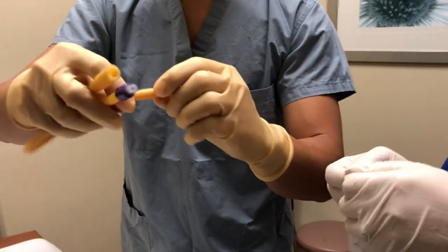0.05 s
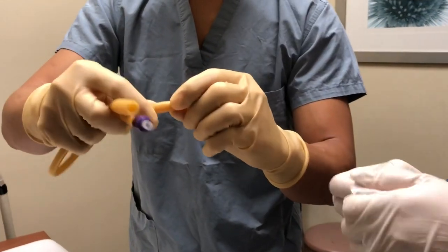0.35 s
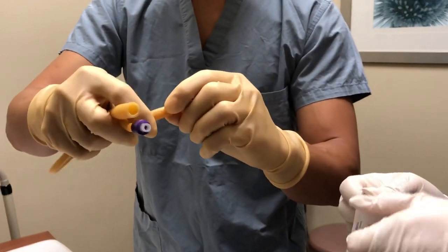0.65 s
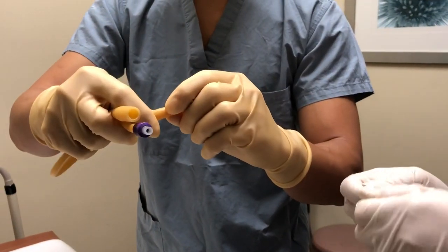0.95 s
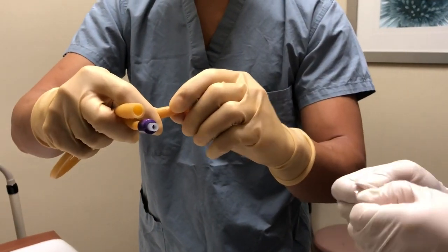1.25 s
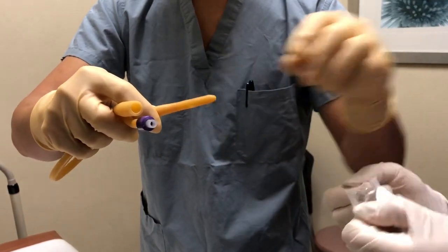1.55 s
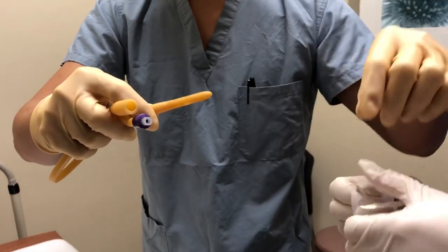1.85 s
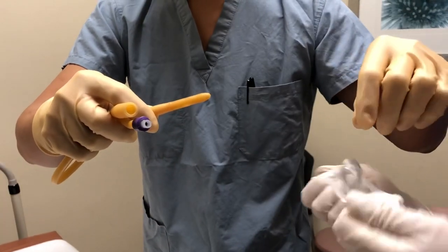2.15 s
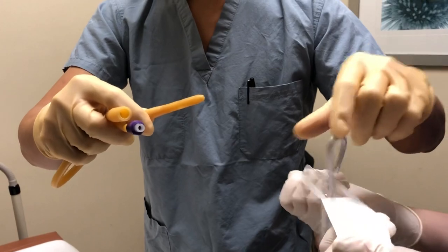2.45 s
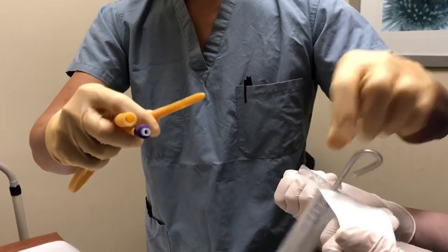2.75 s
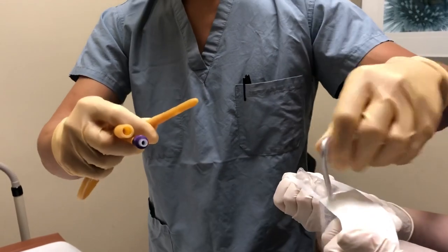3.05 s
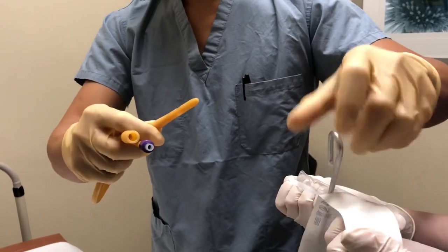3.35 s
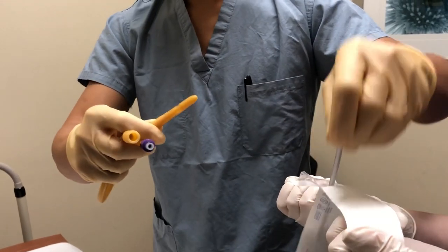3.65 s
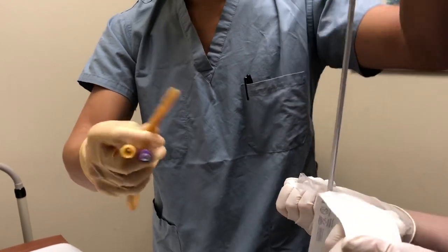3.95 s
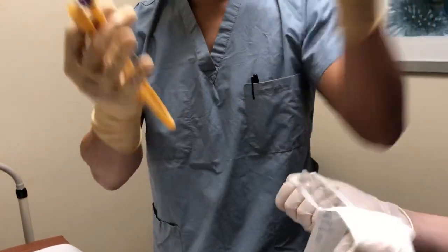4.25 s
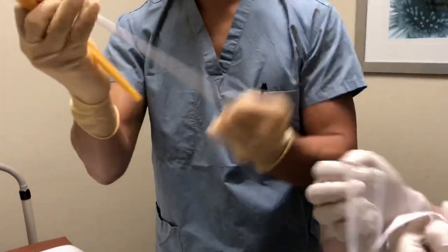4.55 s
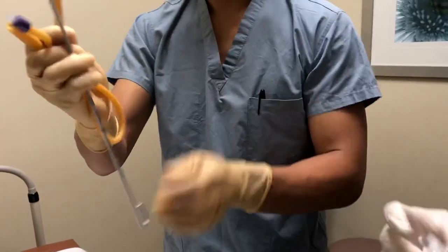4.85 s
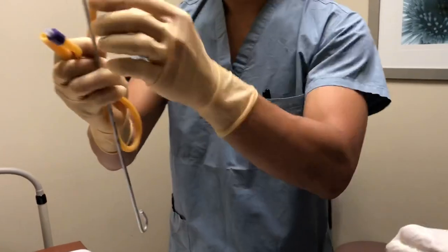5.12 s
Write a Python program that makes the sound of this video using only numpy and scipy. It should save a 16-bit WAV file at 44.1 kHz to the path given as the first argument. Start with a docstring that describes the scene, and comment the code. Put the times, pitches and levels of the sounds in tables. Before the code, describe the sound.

In a small, quiet room with a low fan hum, a sterile paper and plastic sleeve crinkles close by. The crisp snaps come sparsely at first, then grow loud and crowded as it is opened. They thin out, a long rod rubs briefly along the paper and comes free with a soft knock, and a last, lighter run of crackling follows.

```python
"""In a small clinic room with humming ventilation, gloved hands start on a paper and plastic wrapper.
Its creases buckle in sharp snaps over a soft rustle, loudest at 1.5 s and busiest from 2 to 2.6 s.
Near 3.7 s a long rod rubs its way out of this sterile sleeve and knocks as it comes free.
From 4.4 s the wrapper crackles again. The room rings briefly after each sound."""
import sys
import numpy as np
from scipy import signal
from scipy.fft import rfft, irfft, next_fast_len
from scipy.io import wavfile
from scipy.ndimage import uniform_filter1d

SR = 44100
rng = np.random.default_rng(int(sys.argv[2]) if len(sys.argv) > 2 else 0)


def int16_out(signal):
    """Quantize to a 16-bit WAV file."""
    q = np.round(np.clip(np.atleast_2d(signal).T, -1, 1) * 32767)
    wavfile.write(sys.argv[1], SR, q.astype(np.int16))


N = 228521
TIME = np.arange(N) / SR

# the loudest sharp snaps, mostly creases of the wrapper, the one at 3.97 s the rod knocking free: t/s,
# level/dB, centre f/Hz, width/centre, crack level/dB against the body
SHARP_SNAPS = [(0.173, -24.5, 1600, 3.6, -21), (0.195, -23, 2020, 1.2, 2.5),
               (0.2248, -23.5, 3940, 2.5, -12), (0.2798, -22, 3130, 1.8, -17),
               (0.4628, -30.5, 2550, 0.3, 4), (0.5046, -21, 1520, 1.7, -13), (0.5434, -29, 4900, 1.1, -16),
               (0.6561, -28, 5250, 2.5, -30), (0.7088, -12.5, 2770, 2, -32), (0.721, -16, 3500, 1.4, -24),
               (0.759, -17, 3050, 0.42, -27), (0.8039, -19.5, 4000, 3.6, -6), (1.048, -26, 3950, 2.2, -22),
               (1.0832, -24.5, 4180, 1.34, -23), (1.154, -33.5, 1330, 0.45, -12),
               (1.3986, -14.5, 3800, 0.7, -41), (1.424, -18.5, 4280, 1.6, -17), (1.503, 2, 5300, 2.6, -26),
               (1.5087, -8, 6450, 1.2, -26), (1.5385, -16.5, 1820, 2.5, -27), (1.6806, -28, 3000, 2.4, 0),
               (1.6966, -22.5, 4770, 2.3, -6), (1.7296, -27, 3970, 3.3, 14),
               (1.7946, -20.5, 7300, 0.94, -24), (1.834, -8.5, 4970, 2.5, -33),
               (1.9103, -16.5, 6200, 0.48, -2.5), (2.0166, -23.5, 1860, 1.8, -39),
               (2.0674, -16.5, 3200, 1.8, -20), (2.0993, -10.5, 3650, 1.8, -26),
               (2.1225, -16.5, 4100, 1.9, -27), (2.149, -9.5, 4600, 0.99, -29),
               (2.1559, -15, 6460, 0.57, -25), (2.1716, -2, 3760, 2.4, -29),
               (2.205, -12.5, 3100, 5.3, -27), (2.217, -9, 3040, 1.6, -23),
               (2.2489, -5.5, 4000, 1.15, -34), (2.2579, -12.5, 3250, 3.9, -27),
               (2.264, -11.5, 3830, 2.6, -15), (2.291, -9.5, 4050, 0.22, -10),
               (2.3055, -11.5, 3200, 1.7, -24), (2.3278, -4, 3630, 2.7, -16), (2.3543, -3, 4630, 0.79, 10),
               (2.397, -2, 5600, 4.8, 12), (2.4365, -9.5, 4000, 1, -7), (2.5229, -16, 3150, 0.46, -19),
               (2.5315, -9, 3350, 0.76, -11), (2.5863, -7.5, 3700, 0.77, -4),
               (2.6153, -18, 3500, 2.2, -13), (2.716, -23.5, 4930, 2, -30), (2.7958, -31, 2630, 0.75, -9),
               (2.924, -19.5, 3420, 0.7, -47), (3.0663, -19, 6500, 0.57, -7), (3.0944, -18, 2200, 3, -23),
               (3.098, -21.5, 5370, 2.2, -27), (3.2307, -15, 5300, 0.42, -4),
               (3.2489, -17.5, 3970, 0.43, 8), (3.294, -32, 5900, 1.3, -27),
               (3.3449, -15, 4830, 1.13, -24), (3.501, -30, 4170, 1, -37), (3.9746, -19, 1810, 2.9, -29),
               (4.188, -15, 4100, 0.92, -21), (4.403, -21.5, 1910, 3.6, -22),
               (4.4358, -24, 7900, 1.1, -27), (4.4557, -27.5, 4930, 4.2, 10), (4.498, -27, 5600, 1.9, -32),
               (4.586, -23.5, 4840, 1.5, -27), (4.6117, -19, 3160, 1.7, -27),
               (4.6605, -16.5, 3800, 1.65, -8), (4.8185, -18, 4000, 0.25, 11),
               (4.8229, -14.5, 4140, 0.69, -31), (4.8653, -21, 10000, 2.7, -8),
               (4.876, -15.5, 5260, 1.9, -27), (4.8999, -22.5, 1470, 2.5, -27),
               (4.9517, -11, 5000, 6.9, -24), (4.9627, -11, 6050, 1.4, -27), (5.0757, -27, 4200, 5.5, -10)]
# echoes of a snap from nearby surfaces: delay t/s, level/dB
ECHOES = [(.0056, -16), (.0072, -62), (0.0132, -38)]
# sizes of the small creases: centre f/Hz, relative level/dB
SMALL_CREASES = [(1900, -3), (4000, -1), (8000, 0)]
# hand squeezes: start t/s, hold t/s, relative rustle level/dB, rustle f/Hz, relative flapping level/dB
HAND_SQUEEZES = [(.01, 0.013, -59, 3200, -81), (0.259, 0.035, -55, 4360, -62.5),
                 (0.405, 0.14, -67, 4370, -68), (0.716, 0.011, -48, 4680, -59),
                 (0.786, 0.013, -50.5, 3640, -54), (1.03, 0.14, -65.5, 4140, -76),
                 (1.386, 0.035, -56, 5340, -89), (1.521, 0.016, -46, 7600, -61),
                 (1.679, 0.13, -55, 5400, -69.5), (1.913, 0.04, -61.5, 6140, -74),
                 (2.037, .03, -59, 4500, -72), (2.108, 0.022, -49, 4770, -62),
                 (2.162, 0.05, -39.5, 5150, -58), (2.258, 0.074, -46.5, 4000, -51.5),
                 (2.343, 0.086, -45.5, 6860, -54), (2.501, 0.092, -52, 4500, -54.5),
                 (2.942, 0.06, -64, 4230, -65), (3.078, 0.021, -55.5, 6900, -62),
                 (3.247, 0.023, -63, 6060, -77), (3.538, 0.038, -66.5, 4330, -71),
                 (4.153, 0.15, -64, 4470, -73), (4.406, 0.065, -62, 4200, -68.5),
                 (4.545, 0.29, -61.5, 4300, -66.5), (4.834, 0.066, -52.5, 5630, -59),
                 (4.961, 0.015, -52.5, 5840, -56.5), (5.033, 0.1, -60.5, 3560, -63.5)]
# tone of the whole sheet flapping: f/Hz, relative level/dB
FLAP_SPECTRUM = [(100, -15), (200, -3), (350, 1), (600, -4), (1000, -5), (2000, -18.5), (5000, -32.5)]
# tone of the rod rubbing on paper: f/Hz, relative level/dB
RUB_SPECTRUM = [(300, -31), (1200, -12), (2200, -5), (3800, 0.5), (5500, -1.5), (7500, -10.5), (10000, -35)]
# tone of the high hiss of that rubbing: f/Hz, relative level/dB
HISS_SPECTRUM = [(3000, -21), (6000, 1), (8000, 1), (11000, -4.5), (16000, -8)]
# dull knocks of the rod and the sleeve: t/s, level/dB, f/Hz, t/s to fade by 60 dB
ROD_KNOCKS = [(0.507, -29, 1500, 0.029), (1.505, -25.5, 534, 0.016), (2.532, -25, 365, 0.051),
              (2.614, -25.5, 875, 0.02), (3.097, -29, 1180, 0.012), (3.9739, -22, 870, 0.017),
              (3.975, -29, 362, 0.068), (4.063, -30, 644, 0.022), (4.958, -25.5, 260, 0.032)]
# how the fan hum rises and falls: t/s, relative level/dB
FAN_LEVELS = [(0, -54), (.4, -50), (1.3, -55), (1.6, -55), (2.5, -53), (2.8, -52), (3.45, -49),
              (4.0, -58.5), (4.6, -52.5), (5.18, -52.5)]
# tone of the rushing air: f/Hz, relative level/dB
AIR_SPECTRUM = [(15, -18), (27, 1.5), (38, -3.5), (58, -0.5), (80, -2), (118, -1), (160, -7.5),
                (280, -16.5), (500, -21), (1200, -29.5), (4000, -26), (16000, -42)]

GRIP_DB, GRIP_HZ, GRIP_FLAP_DB = -72.5, 4450, -75.5  # wrapper just held, on the scale of the squeezes


def snaps(crack_hz=9400, room_db=-9, facing=0.15):
    """Each buckling crease rings a patch of the sheet and draws a bright crack from the plastic."""
    out = np.zeros(N)
    for s, db, hz, width, crack_db in SHARP_SNAPS:
        push = buckle()
        body = unit_energy(resonate(push, hz, width))
        crack = unit_energy(resonate(push, crack_hz, width=2.9))
        # a small patch gives off low notes poorly
        snap = unit_energy(cut(body + undb(crack_db) * crack, hz=560, kind="high"))
        # a patch that faces the listener is louder and has less room ring
        paths = undb(room_db - facing * db) * room_tail()
        paths[0] += 1  # the direct sound
        for (delay, echo_db), shift in zip(ECHOES, rng.uniform(-1.2, 1, len(ECHOES))):
            paths[int(delay * (1 + .1 * shift) * SR)] += undb(echo_db)
        add(out, s, undb(db) * signal.fftconvolve(snap, paths))
    return out


def buckle(jerk_db=-2, jerk_fade_s=0.0058, shiver_db=-8, shiver_fade_s=0.017):
    """One crease flips in a few quick jerks and the sheet shivers, so no two snaps sound alike."""
    push = undb(jerk_db) * unit_energy(fading_noise(jerk_fade_s, size=1024))
    push += undb(shiver_db) * unit_energy(fading_noise(shiver_fade_s, size=1024))
    push[0] += 1
    # low notes travel more slowly through the sheet and reach its edge later
    for _ in range(3):
        push = signal.lfilter([-.65, 1], [1, -.65], push)
    return push


def squeezes(attack_s=0.026, release_s=0.051):
    """Squeezes swell, hold and relax over a steady grip; gives rustle dB, rustle Hz and flapping dB."""
    power, flap_power = undb(GRIP_DB) ** 2, undb(GRIP_FLAP_DB) ** 2
    weighted_hz = power * GRIP_HZ
    for s, hold, db, hz, flap_db in HAND_SQUEEZES:
        before, after = np.maximum(s - TIME, 0), np.maximum(TIME - s - hold, 0)
        envelope = np.exp(-before / attack_s - after / release_s)
        squeeze = (undb(db) * envelope) ** 2
        power += squeeze
        weighted_hz += squeeze * hz
        flap_power += (undb(flap_db) * envelope) ** 2
    return 10 * np.log10(power), weighted_hz / power, 10 * np.log10(flap_power)


def ticks(level_db, gain_db=-3, resting_per_s=8, doubling_db=9, growth=0.54):
    """Small creases let go one by one, faster and louder the harder the hands squeeze."""
    effort_db = level_db - GRIP_DB
    per_s = resting_per_s * 2 ** (effort_db / doubling_db)
    creases = 0
    for hz, db in SMALL_CREASES:
        pushes = signal.fftconvolve(slips(per_s, spread_db=4), buckle())[:N]
        creases += undb(db) * unit(resonate(pushes, hz, width=0.87))
    return in_room(unit(creases) * undb(GRIP_DB + growth * effort_db + gain_db), room_db=0)


def rustle(level_db, centre_hz, gain_db=2, shift_db=5.5):
    """Countless tiny creases and rubbing gloves; the tone of the sheet shifts as it bends."""
    bands, power = 0, 0
    for hz in np.geomspace(900, 14000, 9):
        octaves = np.log2(hz / centre_hz)
        slope_db = np.minimum(6 * octaves, -8 * octaves)  # quieter on both sides of the centre
        gain = undb(slope_db + shift_db * drift(25.02))
        bands += gain * unit(resonate(slips(1600, spread_db=7), hz, width=0.71))
        power += gain ** 2
    # the fingers catch and slip, so the rustle comes in short spurts
    spurts = unit(undb(3.16 * drift(110)))
    return in_room(bands / np.sqrt(power) * spurts * undb(level_db + gain_db), room_db=-12.5)


def flap(level_db, gain_db=-2):
    """The whole sheet flaps softly under the fingers."""
    sheet = colour(slips(500, spread_db=2.6), FLAP_SPECTRUM)
    return in_room(sheet * undb(level_db + gain_db), room_db=-3.5)


def rod_slide(full_speed_s=3.78, rise_s=0.095, run_s=0.27, release_s=0.068):
    """The rod sticks and slips on the paper, louder and duller as it nears the mouth of the sleeve."""
    t = TIME - full_speed_s
    drawn_s = np.clip(t, 0, run_s)
    # quieter while the rod gathers speed and once it leaves the sleeve
    slack = np.maximum(-t / rise_s, 0) + np.maximum((t - run_s) / release_s, 0)
    level_db = -50.5 + 18.5 * drawn_s - 18 * slack
    hiss_db = -0.5 - 12 * drawn_s
    rub = colour(slips(9000, spread_db=1), RUB_SPECTRUM)
    hiss = undb(hiss_db) * colour(slips(7400, spread_db=2.3), HISS_SPECTRUM)
    rough_db = 1.5 * drift(90)
    return in_room((rub + hiss) * undb(level_db + rough_db), room_db=-9.5)


def knocks():
    """Soft blows of the rod and the sleeve each ring one quickly fading note."""
    out, t = np.zeros(N), TIME[:SR // 4]
    for s, db, hz, fade_s in ROD_KNOCKS:
        note = np.sin(2 * np.pi * hz * t) * np.exp(-np.log(1000) * t / fade_s)
        add(out, s, undb(db) * unit_energy(note))
    return in_room(out, room_db=-2)


def room_tail(low_fade_s=0.26, high_fade_s=0.23, split_hz=7000, build_s=0.00061):
    """The ring of the room, different for each place a sound comes from; the highs die first."""
    lows = cut(fading_noise(low_fade_s, size=14000), split_hz, "low")
    highs = cut(fading_noise(high_fade_s, size=14000), split_hz, "high")
    build_up = 1 - np.exp(-(TIME[:len(lows)] / build_s) ** 2)
    return unit_energy((lows + highs) * build_up)


def in_room(x, room_db):
    """A sound together with the room's ring."""
    return x + undb(room_db) * signal.fftconvolve(x, room_tail())[:N]


def ventilation(hum_hz=59.64, hum_gain_db=-1, octave_db=-15, duct_hz=272, duct_db=-74, air_db=-58.5):
    """A wavering fan hum with its octave and a faint duct tone, in a soft rush of air."""
    level_db = np.interp(TIME, *np.transpose(FAN_LEVELS)) + hum_gain_db
    phase = 2 * np.pi * np.cumsum(hum_hz + 1.27 * drift(5.4)) / SR
    hum = np.sin(phase) * undb(1.6 * drift(7.93))
    hum += np.sin(2 * phase) * undb(octave_db + 2.9 * drift(21))
    duct_phase = 2 * np.pi * np.cumsum(duct_hz + 6 * drift(20)) / SR
    duct = np.sin(duct_phase) * undb(duct_db + 2.4 * drift(13))
    air = undb(air_db) * colour(rng.standard_normal(N), AIR_SPECTRUM)
    return np.sqrt(2) * (hum * undb(level_db) + duct) + air


def slips(per_s, spread_db):
    """Tiny random clicks, a few of them much bigger than the rest."""
    size = undb(spread_db * np.minimum(rng.exponential(size=N), 4))
    return (rng.random(N) < per_s / SR) * size * rng.choice([-1, 1], N)


def drift(per_s):
    """A smooth random wobble, about 1 in size."""
    span = int(SR / per_s)
    steps = np.repeat(rng.standard_normal(N // span + 1), span)
    return unit(uniform_filter1d(uniform_filter1d(steps, span), span)[:N])


def fading_noise(fade_s, size):
    """Noise that dies away by 60 dB in fade_s."""
    return rng.standard_normal(size) * np.exp(-np.log(1000) * np.arange(size) / SR / fade_s)


def colour(x, spectrum):
    """Shape the tone of x with a table of f/Hz, level/dB; the result has strength 1."""
    hz, db = np.transpose(spectrum)
    size = next_fast_len(len(x), True)
    bins = np.maximum(np.fft.rfftfreq(size, 1 / SR), 1)
    gain = undb(np.interp(np.log(bins), np.log(hz), db))
    return unit(irfft(rfft(x, size) * gain, size)[:len(x)])


def resonate(x, hz, width):
    """Make x ring around hz, filtering twice for steep sides; width is a share of hz."""
    size = next_fast_len(len(x), True)
    ratio = np.maximum(np.fft.rfftfreq(size, 1 / SR), 1) / hz
    return irfft(rfft(x, size) / (1 + 1j * (ratio - 1 / ratio) / width) ** 2, size)[:len(x)]


def cut(x, hz, kind):
    """Keep the "low" or the "high" side of hz."""
    return signal.sosfilt(signal.butter(2, hz, kind, fs=SR, output="sos"), x)


def undb(db):
    """Turn decibels into a multiplier."""
    return 10 ** (np.asarray(db) / 20)


def unit(x):
    """Scale to an average strength (rms) of 1."""
    return x / np.sqrt(np.mean(x ** 2))


def unit_energy(x):
    """Scale so the squares add up to 1."""
    return x / np.sqrt(np.sum(x ** 2))


def add(out, s, x):
    """Mix x into out from time s on."""
    start = int(s * SR)
    out[start:start + len(x)] += x[:N - start]


def scene():
    """Wrapper, rod and ventilation together in one channel."""
    level_db, centre_hz, flap_db = squeezes()
    wrapper = snaps() + ticks(level_db) + rustle(level_db, centre_hz) + flap(flap_db)
    return (wrapper + rod_slide() + knocks() + ventilation())[None]


def record(dry):
    """Cut off the highest treble, above 15800 Hz."""
    return signal.sosfilt(signal.ellip(8, .2, 70, 15800, fs=SR, output="sos"), dry)


dry = scene()
out = record(dry)
int16_out(out)
```